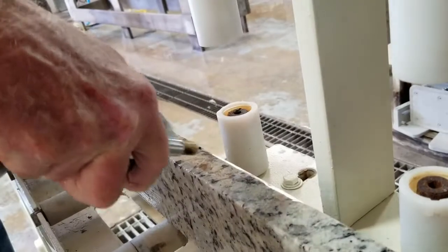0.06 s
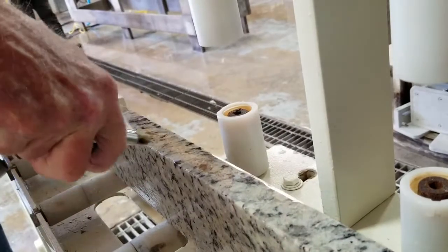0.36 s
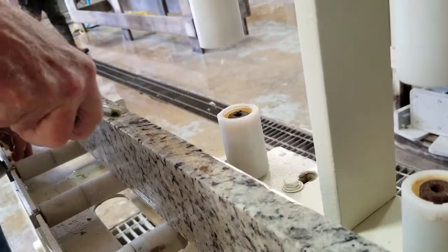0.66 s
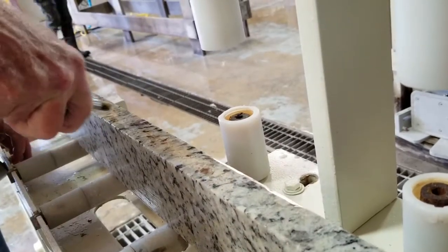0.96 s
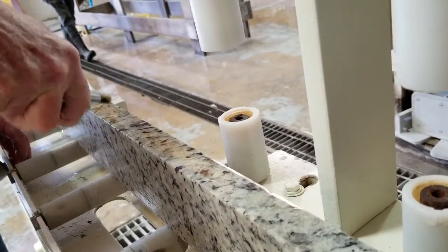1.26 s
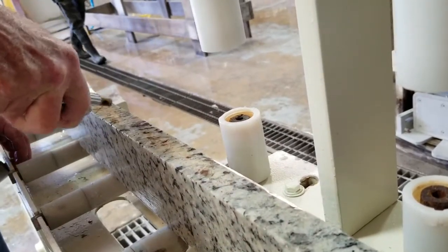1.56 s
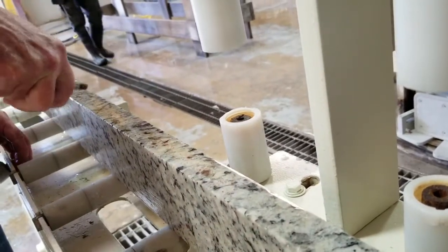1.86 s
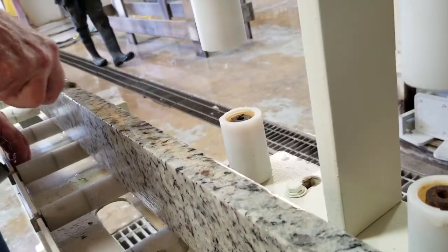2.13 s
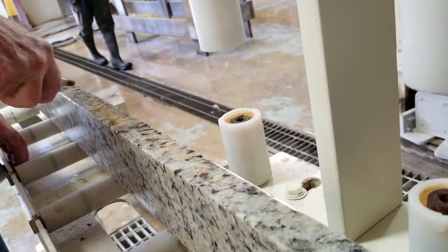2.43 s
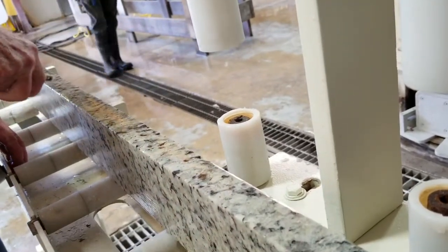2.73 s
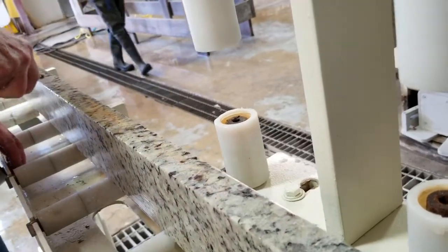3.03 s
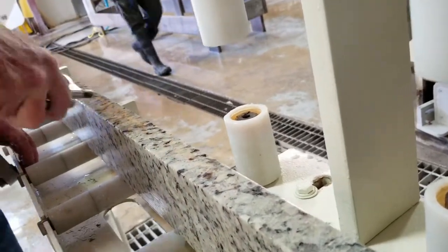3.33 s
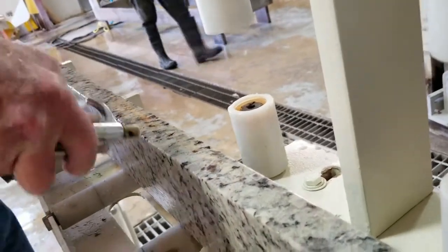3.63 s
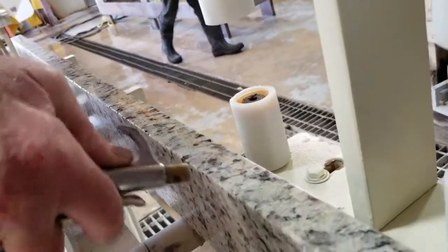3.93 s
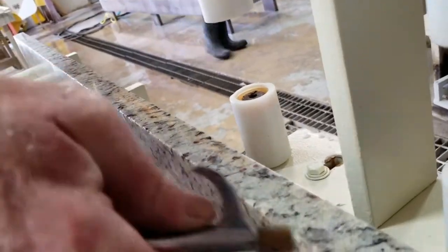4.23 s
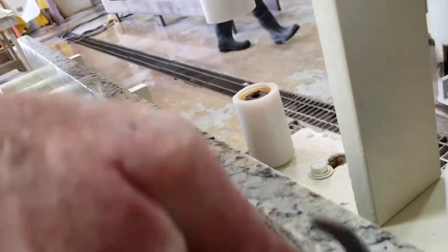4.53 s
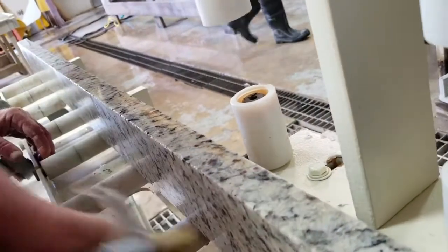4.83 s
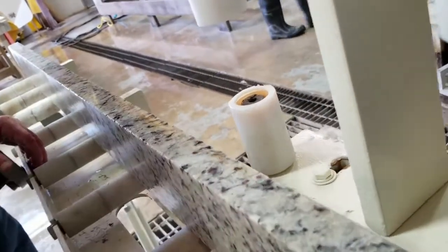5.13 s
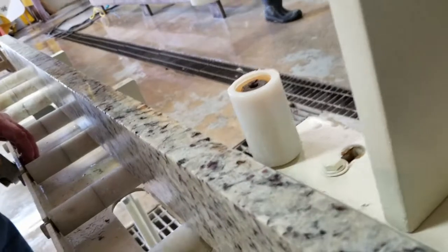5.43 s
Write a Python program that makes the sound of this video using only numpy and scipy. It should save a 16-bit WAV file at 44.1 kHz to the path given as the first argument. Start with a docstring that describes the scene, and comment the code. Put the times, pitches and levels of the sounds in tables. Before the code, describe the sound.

An air gun hisses loudly over wet stone, then cuts off, leaving a polishing machine droning.

```python
"""A stone polishing machine drones while, close by, an air gun blows water off granite.
From the start the turbulent jet hisses at the nozzle, rushes over the wet stone and whistles on edges.
Later it comes back over the rollers, roars in their gaps and tears a few drops into spray.
A low rumble of machine and jet together swells, then drops as the trigger is let go and the air stops.
The machine runs on alone, swelling as it takes load and as the automatic gain control recovers."""
import sys
import numpy as np
from scipy import signal
from scipy.fft import rfft, irfft, next_fast_len
from scipy.io import wavfile
from scipy.ndimage import uniform_filter1d, map_coordinates

SR = 44100
rng = np.random.default_rng(int(sys.argv[2]) if len(sys.argv) > 2 else 0)


def wav_record(signal):
    """Record a signal, one row per channel, as 16-bit PCM in the file named by sys.argv[1]."""
    frames = np.transpose(np.atleast_2d(signal))
    bounded = np.clip(frames, -1, 1)
    # unit amplitude maps onto the largest positive 16-bit level
    quanta = np.round(bounded * 32767).astype(np.int16)
    wavfile.write(sys.argv[1], SR, quanta)


N = 246078
TIME = np.arange(N) / SR
TRIGGER_OFF_S = 4.579


def amp(db):
    return 10 ** (np.asarray(db) / 20)


def unit(x):
    return x / np.sqrt(np.mean(x ** 2) + 1e-20)


def curve(rows):
    """Linear interpolation of (time, value) rows at every sample."""
    return np.interp(TIME, *np.transpose(rows))


def wobble(rate):
    """Smooth random modulation: a spline through rate knots a second."""
    return map_coordinates(rng.standard_normal(int(N * rate / SR) + 4), [TIME * rate])


def filtered(x, response):
    """Linear filtering: the spectrum is multiplied by a frequency response."""
    size = next_fast_len(N + SR // 2)
    return irfft(rfft(x, size) * response(np.fft.rfftfreq(size, 1 / SR)), size)[..., :N]


def coloured(x, spectrum):
    """Spectral shaping by (Hz, dB) rows, at rms 1."""
    freqs, db = np.transpose(spectrum)
    return unit(filtered(x, lambda hz: amp(np.interp(np.log(hz + 1), np.log(freqs), db))))


def turbulence(spectrum, patchy_db):
    """Turbulent noise: its energy fluctuates in patches of time and frequency about a mean spectrum."""
    cells = signal.stft(rng.standard_normal(N), nperseg=512)[2]
    patches = rng.standard_normal(cells.shape)
    for _ in range(2):
        patches = uniform_filter1d(uniform_filter1d(patches, size=3, axis=0), size=9, axis=1)
    noise = signal.istft(cells * amp(patchy_db * unit(patches)), nperseg=512)[1][:N]
    return coloured(noise, spectrum)


def resonance(centre_hz, width_hz):
    """A resonance of given half-power bandwidth, driven by noise, at rms 1."""
    def response(hz):
        damping = (hz * width_hz) ** 2
        return damping / (damping + .42 * (hz ** 2 - centre_hz ** 2) ** 2)
    return unit(filtered(rng.standard_normal(N), response))


def swell(peak_s, scale_s, fall=1):
    """A raised-cosine envelope: it rises for 0.7 of scale_s and falls for that time multiplied by fall."""
    away = (TIME - peak_s) / np.where(TIME < peak_s, scale_s, scale_s * fall)
    return np.cos(np.pi * np.clip(away / 1.4, -.5, .5)) ** 2


def walls(x, echo_db, count=14, latest_s=.022):
    """Early reflections: steel panels and the wet floor return weak delayed copies."""
    delays = rng.uniform(.001, latest_s, count)
    sizes = rng.standard_normal(count)
    impulse = np.bincount(np.round(delays * SR).astype(int), sizes / np.linalg.norm(sizes) * amp(echo_db))
    impulse[0] = 1
    return signal.fftconvolve(x, impulse / np.linalg.norm(impulse))[:N]


# The low rumble of machine and jet together. Each row: frequency in Hz, relative level in dB.
RUMBLE_SPECTRUM = [(25, -36), (50, -27), (90, -8.5), (140, -7.5), (200, -1.5), (280, 1), (350, 0.5),
                   (450, -16.5), (700, -37)]
# It swells while the jet blows and drops when it stops. Each row: time in seconds, level in dB.
RUMBLE_ENVELOPE = [(0, -44), (1.4, -46), (2.2, -40.5), (3.7, -40.5), (4.45, -36.5), (4.62, -47), (5.2, -45)]
def low_rumble():
    """Low-frequency noise: the machine and the air jet merge into one rumble."""
    return turbulence(RUMBLE_SPECTRUM, patchy_db=1.5) * amp(curve(RUMBLE_ENVELOPE))


# Spectra of the grinding and the water spray. Each row: frequency in Hz, relative level in dB.
GRINDING_SPECTRUM = [(100, -38), (350, -7), (500, -1.5), (740, -9), (1050, 1.5), (1500, -6.5), (2100, -2.5),
                     (2600, -3), (3600, -0.5), (7300, -2.5), (8500, -12)]
SPRAY_SPECTRUM = [(7000, -9.5), (8800, -9), (11500, 2), (14000, 2.5), (15700, -2.5)]
def polishing_heads():
    """Friction and spray noise: the heads grind the stone and spray it with water."""
    grinding = turbulence(GRINDING_SPECTRUM, patchy_db=2.0) * amp(-33.0 + 0.36 * wobble(12))
    spray = turbulence(SPRAY_SPECTRUM, patchy_db=0.0) * amp(-40.5)
    return grinding + spray


def spindle_hum(pitch_hz=392.5, waver_hz=3.5, drift_hz=5):
    """Frequency modulation: the spindle's tone wavers as its speed sags and recovers with the load."""
    hz = pitch_hz + waver_hz * wobble(25) + drift_hz * wobble(4)
    phase = 2 * np.pi * np.cumsum(hz) / SR
    return unit(np.sin(phase) * amp(1.5 * wobble(12))) * amp(-47.7)


# Modes of belts and panels. Each row: frequency in Hz, bandwidth in Hz, relative level in dB.
PANEL_MODES = [(108, 5.4, -62), (153, 5.9, -65.5), (950, 69, -46.5), (1934, 65, -45), (3740, 500, -48)]
# Their swell under load. Each row: time in seconds, gain in dB.
LOAD_GAIN = [(4.7, -3.5), (5.1, 1)]
def panel_drone():
    """Forced vibration: belts and panels ring at their modes, louder as the machine takes load."""
    load_db = curve(LOAD_GAIN)
    return sum(amp(db + load_db - 0.1 * wobble(10)) * resonance(hz, width)
               for hz, width, db in PANEL_MODES)


# Drops torn up by the jet. Each row: start in seconds, relative level in dB.
DROP_BURSTS = [(3.6134, -11), (3.7544, -9), (4.5418, 0.5), (4.5694, -18)]
def bursting_drops(fall_20db_s=0.0089):
    """Atomisation: each drop bursts into a sharp fizz that decays exponentially."""
    envelope = sum(amp(db - 14.0 - 20 * np.abs(TIME - start) / fall_20db_s) * (TIME >= start)
                   for start, db in DROP_BURSTS)
    fizz = coloured(rng.standard_normal(N), [(2000, -20), (7000, -17), (12000, -5), (15500, -3)])
    return envelope * fizz


# Hollows. Each row: peak time and time scale in seconds, frequency in Hz, relative level in dB.
CAVITIES = [(0.065, 0.25, 550, -40.5), (0.228, 0.093, 760, -32), (0.469, .12, 800, -32),
            (3.627, 0.1, 614, -36.5), (3.9, 0.11, 1420, -27), (4.007, 0.8, 716, -37),
            (4.24, 0.99, 3270, -30.5), (4.473, 0.14, 420, -37.5)]
def cavity_puffs(relative_width=0.66):
    """Damped cavity resonance: a hollow answers the passing jet with a broad puff."""
    return sum(amp(db) * swell(peak, scale) * resonance(hz, relative_width * hz)
               for peak, scale, hz, db in CAVITIES)


# Whistling edges. Each row: peak time and time scale in seconds, frequency in Hz, relative level in dB.
EDGES = [(0.176, 0.43, 4470, -30), (0.315, 0.42, 7780, -29.5), (.48, 0.55, 7000, -30.5),
         (0.753, 0.87, 3500, -37.5), (2.5, 0.67, 8000, -34), (3.245, 0.29, 7550, -26),
         (3.73, .48, 3290, -29), (3.72, 0.28, 6650, -25.5), (3.88, 0.34, 4220, -30),
         (4.218, .26, 11700, -26.5), (4.505, 0.27, 12600, -24)]
def edge_tones(lean_db, faint_count=22, low_hz=4530, high_hz=14260):
    """Edge tones: each edge sings a breathy band; a squarer aim strengthens the faint, random ones."""
    def whistle(peak, scale, hz):
        return swell(peak, scale, fall=0.44) * resonance(hz, width_hz=190)
    loud = sum(amp(db) * whistle(peak, scale, hz) for peak, scale, hz, db in EDGES)
    faint = sum(whistle(when * TRIGGER_OFF_S, .16, low_hz + pitch * (high_hz - low_hz))
                for when, pitch in rng.random((faint_count, 2)))
    return loud + amp(-32.5 + lean_db) * faint


# The spectrum of air in the gaps. Each row: frequency in Hz, relative level in dB.
GAP_SPECTRUM = [(30, -45), (100, -29), (200, -9.5), (350, -1), (600, -5.5), (900, 1.5), (1250, 2.5),
                (1900, 3), (2700, -1), (5000, -26)]
# The hand reaches away and returns over the rollers. Each row: time in seconds, nearness from 0 to 1.
HAND_NEARNESS = [(0, 0.37), (.5, 0.62), (.68, 0.14), (3.2, 0), (3.68, 0.94), (4.1, 0.92), (4.35, 0.53)]
def gap_roar(lean_db, sputter_db, near_gain_db=8.5):
    """Large eddies make low noise: the gaps by the rollers roar, more as the hand comes near."""
    level_db = -41 + 0.24 * lean_db + near_gain_db * curve(HAND_NEARNESS)
    return turbulence(GAP_SPECTRUM, patchy_db=1.8) * amp(level_db + 1.9 * sputter_db + .8 * wobble(30))


# The spectrum of air on wet stone. Each row: frequency in Hz, relative level in dB.
STONE_SPECTRUM = [(900, -47), (1800, -10), (2600, -7), (3300, -2), (4500, 0), (5700, 0.5), (6900, 2.5),
                  (7600, 1.5), (8500, -4.5), (10500, -20.5)]
def stone_rush(aim_db, sputter_db):
    """Impingement noise: the more squarely the jet meets the stone, the louder it rushes."""
    return turbulence(STONE_SPECTRUM, patchy_db=2.13) * amp(aim_db - 1.5 + 1.3 * sputter_db)


# The two bands of the hiss. Each row: frequency in Hz, relative level in dB.
HISS_LOWER_BAND = [(6000, -36), (8500, -14.5), (9700, -8.5), (10700, -5), (11700, 0), (12500, 0.5),
                   (13200, -2), (14000, -33), (15500, -35)]
HISS_UPPER_BAND = [(11500, -50), (12700, -14), (13400, 4.5), (14500, 6), (15200, 7), (16500, -4)]
# Brightness as the nozzle turns. Each row: time in seconds, the upper band's share of the power.
UPPER_SHARE = [(0, 0.73), (.65, .76), (1.1, 0.58), (1.9, 0.81), (2.3, 0.55), (3.65, 0.7), (4.55, 0.56)]
# The strength of the hiss. Each row: time in seconds, relative level in dB.
HISS_LEVEL = [(0.0, -19.5), (0.51, -17), (0.65, -18.5), (1.34, -20), (1.38, -22.5), (1.65, -15.5),
              (1.72, -22.5), (1.8, -18), (2.43, -17.5), (2.6, -20), (3.62, -16), (4.02, -17.5),
              (4.16, -17.5), (4.41, -21), (4.45, -20), (4.55, -19.5)]
def nozzle_hiss(sputter_db):
    """Turbulent mixing: fine eddies at the nozzle radiate the highest frequencies."""
    share = curve(UPPER_SHARE)
    lower = np.sqrt(1 - share) * turbulence(HISS_LOWER_BAND, patchy_db=1.9)
    upper = np.sqrt(share) * turbulence(HISS_UPPER_BAND, patchy_db=2.2)
    flicker_db = sputter_db + 0.32 * wobble(90) + 0.93 * wobble(810)
    return (lower + upper) * amp(curve(HISS_LEVEL) - .5 + flicker_db)


def stone_reflection(x, lag_s=.0017, sway_s=0.000172, echo_db=-12):
    """Comb filtering: the polished face mirrors the sound with a lag that sways with the hand."""
    delayed_index = (TIME - lag_s - sway_s * wobble(2.55)) * SR
    return (x + amp(echo_db) * map_coordinates(x, [delayed_index])) / np.hypot(1, amp(echo_db))


def valve(closing_s=0.0052, echo_db=-19, echo_t60_s=0.25):
    """Reverberant decay as an envelope: the valve snaps shut and a faint tail dies between the walls."""
    since = np.maximum(TIME - TRIGGER_OFF_S, 0)
    return np.maximum(amp(-60 * since / closing_s), amp(echo_db - 60 * since / echo_t60_s))


# How squarely the sweeping jet meets the stone. Each row: time in seconds, relative level in dB.
JET_AIM = [(0.0, -23), (0.04, -25), (0.41, -21), (0.59, -22), (0.67, -26), (0.79, -23), (0.87, -26),
           (1.09, -23), (1.4, -29.5), (1.51, -25), (1.7, -28.5), (2.25, -22), (2.43, -27), (2.55, -21),
           (2.87, -27.5), (3.07, -21.5), (3.13, -28.5), (3.16, -23), (3.39, -24.5), (3.69, -19),
           (3.97, -25), (4.04, -23), (4.41, -26), (4.52, -24)]
def air_gun(ease_at_s=4.528, ease_s=0.037, ease_db=-15):
    """Aerodynamic sound: one jet drives these air noises, so one valve ends them."""
    aim_db = curve(JET_AIM)
    lean_db = aim_db - aim_db.mean()
    sputter_db = 0.58 * wobble(60) + 0.6 * wobble(260)  # the water film breaks up under the jet
    # The easing trigger takes the jet off the stone before the valve shuts.
    contact = amp(ease_db * np.clip((TIME - ease_at_s) / ease_s, 0, 1))
    jet = nozzle_hiss(sputter_db)
    jet += contact * (stone_rush(aim_db, sputter_db) + gap_roar(lean_db, sputter_db))
    jet *= amp(0.42 * wobble(20))  # hand tremor
    jet = walls(stone_reflection(jet), echo_db=-13)
    return valve() * (jet + edge_tones(lean_db) + cavity_puffs() + bursting_drops())


def scene(gun_gain_db=11.0):
    """Superposition: the near gun adds to the background, alike in both channels."""
    gun = amp(gun_gain_db) * air_gun()
    background = low_rumble() + walls(polishing_heads(), echo_db=-12.5) + spindle_hum() + panel_drone()
    return np.tile(background + gun, (2, 1))


def gain_control(x, threshold_db=-27, range_db=9.5, release_s=0.17):
    """Compression: loud sound lowers the gain at once, within a limited range; it then creeps back."""
    power = uniform_filter1d(np.mean(x ** 2, axis=0), size=441)
    level_db = 10 * np.log10(np.abs(power) + 1e-12)
    excess_db = np.clip(level_db - threshold_db, 1e-6, range_db)
    fading = TIME / release_s
    cut_db = np.exp(np.maximum.accumulate(np.log(excess_db) + fading) - fading)  # decaying peak hold
    return x * amp(-cut_db)


def record(dry, top_hz=15780):
    """Band limiting: after the gain control, nothing above top_hz passes."""
    return filtered(gain_control(dry), lambda hz: hz < top_hz)


dry = scene()
out = record(dry)
wav_record(out)
```